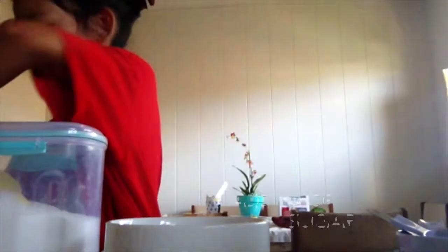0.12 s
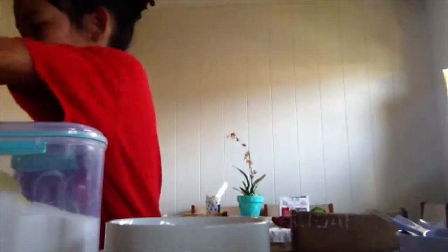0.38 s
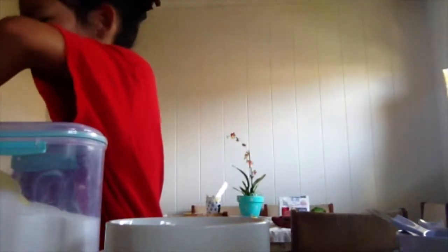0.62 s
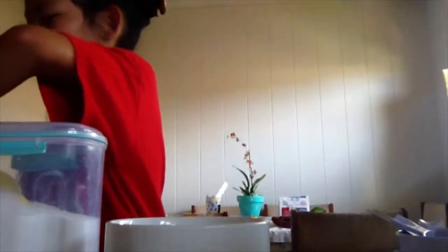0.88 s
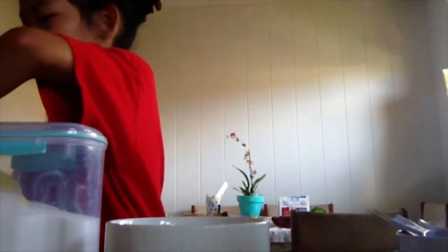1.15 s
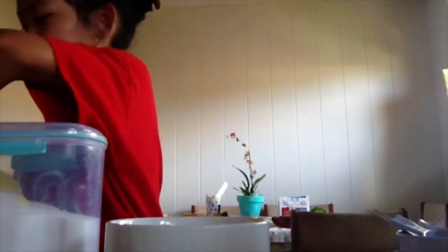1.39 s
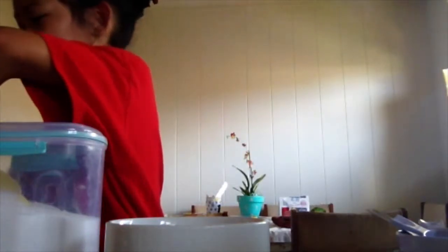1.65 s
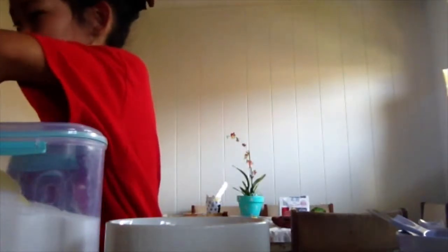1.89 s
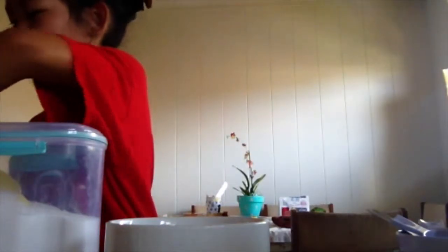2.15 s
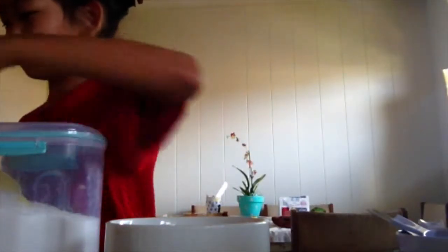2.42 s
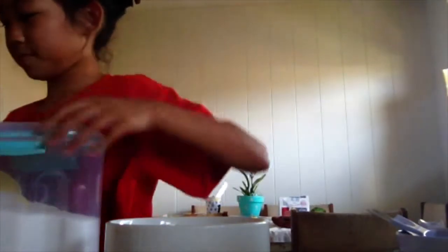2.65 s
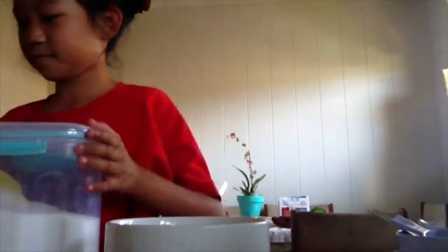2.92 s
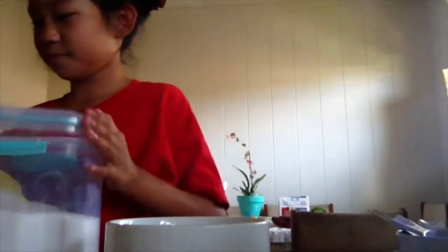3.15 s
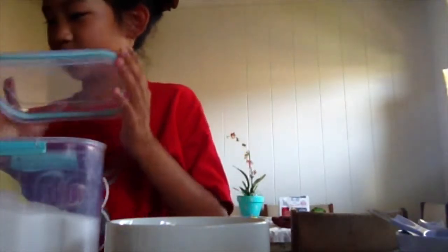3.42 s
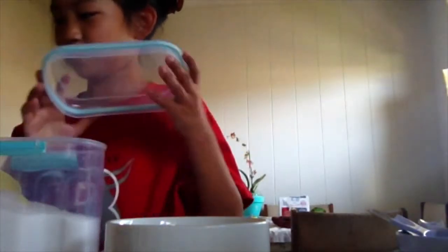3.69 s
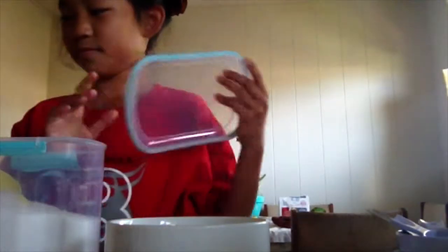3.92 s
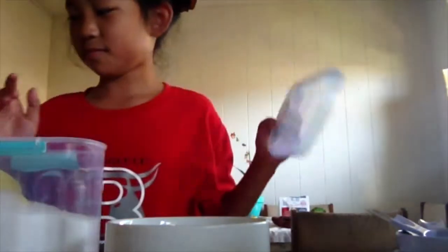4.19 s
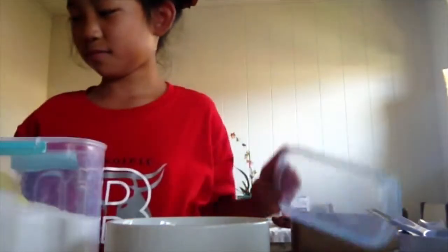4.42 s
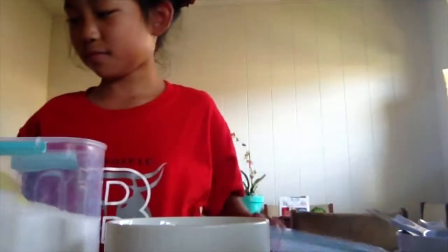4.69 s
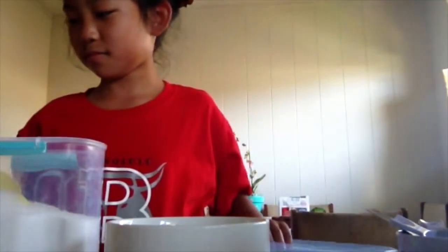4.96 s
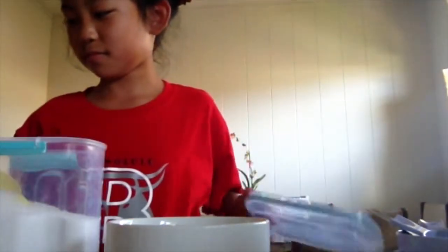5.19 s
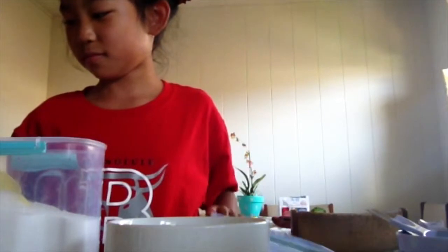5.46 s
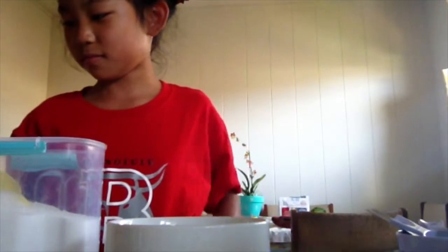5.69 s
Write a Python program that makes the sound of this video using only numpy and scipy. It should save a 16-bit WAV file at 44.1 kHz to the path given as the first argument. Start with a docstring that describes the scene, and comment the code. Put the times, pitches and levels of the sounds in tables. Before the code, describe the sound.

Plastic containers clack and shuffle on a table in a quiet kitchen; a sharp clack midway, later two loud lid slaps.

```python
"""Tubs and a lid on a kitchen table

A faint gliding tone comes before the first knocks. Plastic tubs and a measuring cup are shifted and knocked
on a wooden table in a quiet kitchen, then a flat plastic lid is lifted off a tub, dropped, rattles and is
turned over. Bursts of micro-bounces ring modes of plastic, table and hard edge; drags are dense grains
through such modes; filtered noise makes the room tail. A low room hum and microphone hiss, both of shaped
noise, lie underneath.
"""
import sys
import numpy as np
from scipy import signal
from scipy.fft import rfft, irfft, next_fast_len
from scipy.io import wavfile

SR = 44100
rng = np.random.default_rng(int(sys.argv[2]) if len(sys.argv) > 2 else 0)


def transcribe(signal):
    """Save signal, clipped to [-1, 1], as a 16-bit WAV file at the path in sys.argv[1]."""
    frames = np.atleast_2d(signal).T
    limited = np.clip(frames, -1, 1)
    pcm = np.round(limited * 32767).astype(np.int16)
    wavfile.write(sys.argv[1], SR, pcm)


def boost_factor(decibels):
    """Convert a level in decibels to a linear amplitude factor."""
    exponent = np.asarray(decibels, float) / 20
    return 10 ** exponent


N = 256970


def rms_one(x):
    """Scale to unit rms."""
    return x / np.sqrt(np.mean(x ** 2) + 1e-20)


def drift(rate_hz):
    """Slow chance with spread 1: noise through two equal low-pass poles, computed at every 40th sample."""
    step, settle = 40, 2000
    pole = np.exp(-2 * np.pi * rate_hz * step / SR)
    noise = rng.standard_normal(N // step + settle + 2)
    slow = rms_one(signal.lfilter([1], [1, -2 * pole, pole ** 2], noise)[settle:])
    return np.interp(np.arange(N) / step, np.arange(len(slow)), slow)


# Faint narrow gliding tone before the first knocks: start t/s, end t/s, from f/Hz, to f/Hz, rms level/dB
FAINT_GLIDES = [(0, 0.101, 1120, 1015, -59), (0.219, .285, 1003, 1195, -55.5)]


def faint_tone():
    """A gliding tone, blurred by fast chance in amplitude and phase into a narrow hiss."""
    fade_s = 0.0082
    t, out = np.arange(N) / SR, 0
    blur = 1 + drift(60) + 1j * drift(60)
    for start, end, from_hz, to_hz, level_db in FAINT_GLIDES:
        glide_hz = np.interp(t, [start, end], [from_hz, to_hz])
        phase = 2 * np.pi * np.cumsum(glide_hz) / SR
        outside_s = np.maximum(0, np.maximum(start - t, t - end))
        tone = rms_one(np.imag(blur * np.exp(1j * phase)))
        out = out + boost_factor(level_db) * np.exp(-outside_s / fade_s) * tone
    return out


# Spectrum of room hum and microphone hiss: f/Hz, relative level/dB per Hz
QUIET_SPECTRUM = [(13, -74), (22, -49), (87, -27), (108, -18), (138, -9), (172, -2.5), (260, -6.5),
                  (282, -10.5), (324, -5), (545, -9.5), (608, -14), (737, -14), (2210, -31.5), (5320, -32),
                  (15500, -33)]


def quiet():
    """Steady noise of the room and the microphone; the low part wavers a little."""
    level_db = -51
    size = next_fast_len(N)
    hz = np.arange(size // 2 + 1) * SR / size + 1     # 1 Hz up, to keep the logarithm finite
    at_hz, db = np.transpose(QUIET_SPECTRUM)
    shape = boost_factor(np.interp(np.log(hz), np.log(at_hz), db))
    noise = rms_one(irfft(rfft(rng.standard_normal(size)) * shape, size)[:N])
    low = signal.sosfilt(signal.butter(1, 900, fs=SR, output="sos"), noise)
    waver_db = 2.2 * drift(8.1) + 1.3 * drift(45)
    return boost_factor(level_db) * (noise - low + low * boost_factor(waver_db))


def ringing(modes, spread_db, damping):
    """Response of a body to one soft touch; every touch lands elsewhere and weighs the modes anew."""
    rise_cycles = 0.27
    hz, level_db, t60 = np.transpose(modes)[:, :, None]
    t = np.arange(SR // 4) / SR
    weight = boost_factor(level_db + spread_db * rng.standard_normal(hz.shape))
    weight = weight * rng.choice([-1, 1], hz.shape)
    # the grip bends the plastic and detunes it; table modes scatter alike
    hz = hz * (1 + 0.015 * rng.standard_normal(hz.shape))
    rise = (1 - np.exp(-t * hz / rise_cycles)) ** 2     # plastic yields, so no mode starts abruptly
    decay = boost_factor(-60 * damping * t / t60)
    return np.sum(weight * rise * decay * np.sin(2 * np.pi * hz * t), axis=0)


def chatter(decay_ms):
    """The force of a contact: one blow among uneven micro-bounces that swell for a moment, then die."""
    main_blow_s, swell_s = 0.0028, 0.0021     # the main blow lands after the first edge touches
    bounces_per_s = 5000
    t = np.arange(SR // 10) / SR
    bounces = rng.standard_normal(len(t)) * (rng.random(len(t)) < bounces_per_s / SR)
    force = bounces * (1 - np.exp(-t / swell_s)) ** 2
    force[round(main_blow_s * SR)] = 2.28
    return force * np.exp(-1000 * np.maximum(t - main_blow_s, 0) / max(decay_ms, 0.3))


# Wooden table: f/Hz, relative level/dB, t60/s before contact damping
TABLE_MODES = [(150.4, -16.5, 0.057), (169.5, -10.5, 0.17), (219, -8, 0.043), (279, -4, 0.035),
               (358, 2.5, 0.044), (404.4, 1, 0.028), (459, 0.5, 0.032)]


def knocks(rows, plastic, bright, tick, tick_db):
    """One force rings plastic, table and the hard edge; strong blows rebound at once, weak ones linger."""
    firm_db, firm_ms, firmer_shortens = -22, 8.3, 0.32     # dB shorter for each dB stronger
    tick_follows_weight, usual_weight_db = 0.17, -16     # an edge landing squarely on the table ticks more
    out, first = np.zeros(N + SR), SR // 80     # side parts are levelled over their first 12.5 ms
    for start_s, peak_db, weight_db, hardness_db in rows:
        decay_ms = firm_ms * boost_factor(firmer_shortens * (firm_db - peak_db))
        force, at = chatter(decay_ms), round(start_s * SR)
        damping = max(1.3, decay_ms / 5)     # staying in touch damps the ring
        body, *rest = [signal.fftconvolve(force, ringing(modes, spread_db=2.5, damping=damping))
                       for modes in (plastic, TABLE_MODES, bright, tick)]
        sound = body / np.abs(body).max()
        edge_tick_db = hardness_db + tick_db + tick_follows_weight * (weight_db - usual_weight_db)
        for part, level_db in zip(rest, (weight_db, hardness_db, edge_tick_db)):
            sound += boost_factor(level_db) * part / np.sqrt(np.mean(part[:first] ** 2))
        out[at:at + len(sound)] += boost_factor(peak_db) * sound
    return out[:N]


# Tub on the table: t/s, plastic peak level/dB, table level/dB and hard-edge level/dB re that peak
TUB_KNOCKS = [(0.279, -32.5, -11.5, -18), (0.315, -29, -9, -14.5), (0.332, -26.5, -5.5, -18.5),
              (0.363, -24, -9.5, -15), (0.39, -29, -22, -16.5), (0.519, -32.5, -16, -25)]
# Body and bright ring of cup and tub: f/Hz, relative level/dB, t60/s before contact damping
CUP_MODES = [(553, 1.5, 0.035), (596, -6.5, 0.096), (708, -8, 0.046), (785, -9, 0.098), (897, -16.5, 0.12),
             (983, -1.5, 0.065), (1060, 1.5, 0.028), (1387, 2, 0.018), (1353, -6.5, 0.06)]
CUP_BRIGHT_MODES = [(1550, -6, .03), (1810, -12, .15), (1870, -2, .04), (1975, 0, .05), (2060, -3, .035),
                    (2330, -7, .02), (2640, -8, .015), (2950, -10, .012)]
# Tick of the hard rim of tub or lid: f/Hz, relative level/dB, t60/s before contact damping
RIM_TICK_MODES = [(3120, 6, 0.0034), (3970, -3, 0.0057), (4610, -4, 0.0079), (5430, 0, 0.0035),
                  (7000, -11, 0.0088), (8250, -12.5, 0.0032), (9400, -10.5, 0.0037), (11900, -13, 0.0037),
                  (14800, -16, 0.0041)]


def tub_knocks():
    """A tub rings like the cup, but its hard rim ticks like the lid's."""
    return knocks(TUB_KNOCKS, CUP_MODES, CUP_BRIGHT_MODES, RIM_TICK_MODES, tick_db=-9.5)


# The kitchen's tail, band above band from 60 Hz: upper f/Hz, level/dB, t60/s
ROOM_BANDS = [(480, -7.5, 0.31), (1403, -10, 0.19), (3000, -12.5, 0.3), (12440, -11, 0.18)]


def kitchen(x):
    """Dense reflections: noise that swells for a few ms and dies band by band."""
    t, tail, low_hz = np.arange(SR // 2) / SR, 0, 60
    for top_hz, level_db, t60 in ROOM_BANDS:
        band_pass = signal.butter(2, [low_hz, top_hz], "band", fs=SR, output="sos")
        band = signal.sosfilt(band_pass, rng.standard_normal(len(t)))
        band = band * boost_factor(-60 * t / t60) * (1 - np.exp(-t / 0.012))
        share = 2 * (top_hz - low_hz) / SR     # a click's energy in this band
        tail = tail + boost_factor(level_db) * band * np.sqrt(share / np.sum(band ** 2))
        low_hz = top_hz
    return signal.fftconvolve(x, tail)[:N]


# Plastic dragged over wood: start t/s, loudest t/s, end t/s, rms level/dB at the loudest,
# hiss of the hard edge re that level/dB
DRAGS = [(0.36, 0.474, 0.66, -47.5, -12.5), (0.732, 0.755, 0.84, -48, -23), (0.842, 0.962, 1.12, -41, -21),
         (1.065, 1.112, 1.244, -42, -21), (1.264, 1.31, 1.52, -58, -6), (1.395, 1.66, 2.4, -55, -23),
         (2.08, 2.397, 2.5, -55.5, -25), (4.622, 4.66, 4.73, -39, -13.5), (5.347, 5.371, 5.44, -35, -24),
         (5.667, 5.75, 6, -44.5, -16)]


def drags():
    """Dense stick-slip grains excite the plastic, damped by the hand, and the table while something slides."""
    swell_db = 12.5     # rise from either end to the loudest moment
    t, level, edge = np.arange(N) / SR, 0, 0
    for start, loudest, end, db, edge_db in DRAGS:
        below_db = np.interp(t, [start, loudest, end], [swell_db, 0, swell_db])
        swell = boost_factor(db - below_db) * (t > start) * (t < end)
        level = level + swell
        edge = edge + boost_factor(edge_db) * swell
    noise = rng.standard_normal(N)
    grains_per_s = 2500 * boost_factor(3 * drift(25))
    grains = rms_one(noise * (rng.random(N) < grains_per_s / SR))
    out = 0
    for modes, gain in [(CUP_MODES, level), (TABLE_MODES, boost_factor(-5.5) * level),
                        (CUP_BRIGHT_MODES, boost_factor(-11) * level), (RIM_TICK_MODES, edge)]:
        body = ringing(modes, spread_db=0, damping=4)
        out = out + signal.fftconvolve(gain * grains, body)[:N] / np.sqrt(np.sum(body ** 2))
    return out


# Dull thuds of a hand or a tub on the table: t/s, table rms level/dB at the onset
THUDS = [(0.483, -43), (2.899, -38), (3.114, -44), (3.178, -42), (3.222, -45), (3.871, -41.5)]
# Lid body and its bright ring: f/Hz, relative level/dB, t60/s before contact damping
LID_MODES = [(528, -6, 0.04), (652, -7, 0.02), (637, -10.5, 0.02), (750, -12, 0.017), (815, -7, 0.016),
             (856, 1, 0.018), (947, 2, 0.0096), (1085, -21, 0.034), (1324, -7.5, 0.038), (1476, -12, 0.027)]
LID_BRIGHT_MODES = [(1520, -3, .03), (1650, -4, .03), (1810, -4, .03), (1940, -2, .035), (2200, -8, .02),
                    (2500, -11, .015), (2850, -14, .012)]
LID_TICK_DB = -12.5     # tick of the lid's edge re its bright ring, before the table's weight alters it


def thuds():
    """The table takes the blow and the lid nearby answers faintly."""
    lid_db, hardness_db = -7, -24.5     # lid peak re the table; bright ring re the lid peak
    rows = [(start_s, db + lid_db, -lid_db, hardness_db) for start_s, db in THUDS]
    return knocks(rows, LID_MODES, LID_BRIGHT_MODES, RIM_TICK_MODES, LID_TICK_DB)


# Cup on the table: t/s, plastic peak level/dB, table level/dB and hard-edge level/dB re that peak
CUP_KNOCKS = [(0.748, -29, -18, -16.5), (0.767, -29.5, -17, -36), (0.861, -29, -22, -9.5),
              (0.882, -24.5, -5.5, -20), (0.936, -28, -22, -18), (0.954, -27.5, -22, -9),
              (0.997, -36.5, -27, -8), (1.036, -27.5, -35, -17), (1.07, -39, 1, -19),
              (1.089, -20.5, -9, -26), (1.125, -29, -12.5, -19), (1.175, -33.5, -6, -21),
              (1.477, -32, -11.5, -29), (1.499, -30.5, -6.5, -36), (1.68, -36.5, -33, -22),
              (1.711, -31, -13, -20), (1.836, -7.5, -20, -12), (2.088, -24.5, -25, -16.5),
              (2.141, -29.5, -22, -18), (2.176, -23, -42, -12), (2.229, -25, -40, -17.5),
              (2.274, -26, -25, -19), (2.312, -24, -15, -12), (2.344, -26.5, -29, -20),
              (2.376, -24.5, -37, -13), (2.402, -20.5, -19, -12.5), (2.424, -28, -16, -10)]
# Tick of the cup's edge: f/Hz, relative level/dB, t60/s before contact damping
CUP_TICK_MODES = [(3553, -1.5, 0.0061), (3470, 0.5, 0.0079), (4170, -12, 0.003), (4770, -29, 0.039),
                  (5500, -16.5, 0.0023), (7160, -25.5, 0.0022)]


def cup_knocks():
    """The measuring cup's wall rings on the table and its edge ticks."""
    return knocks(CUP_KNOCKS, CUP_MODES, CUP_BRIGHT_MODES, CUP_TICK_MODES, tick_db=-17)


# Lid on the table: t/s, plastic peak level/dB, table level/dB and hard-edge level/dB re that peak
LID_KNOCKS = [(4.509, -2.5, -9, -30), (4.543, -35.5, -35, -8), (4.575, -19, -27, -20),
              (4.59, -32, -19, -14), (4.611, -27, -1, -32), (4.632, -17.5, -21, -12.5),
              (4.655, -29.5, -10, -6), (4.674, -27, -8, -11), (4.737, -23, -16, -20), (4.748, -37, -2, -21),
              (4.82, -26.5, -5.5, -13.5), (4.845, -34.5, -13, -17), (5.05, -42, -7, -17.5),
              (5.111, -25, -15, -20.5), (5.129, -30.5, -22, -30), (5.352, -5.5, -7, -24),
              (5.445, -24, -32, -19), (5.64, -30, -10, -21.5), (5.668, -35.5, 11, -11.5),
              (5.697, -20.5, 4.5, -17), (5.716, -32.5, 7, -18), (5.744, -29.5, -14.5, -6.5),
              (5.76, -25.5, -9, -15.5), (5.777, -42, -21, -12), (5.795, -28, -9, -13.5)]


def lid_knocks():
    """The flat lid drops and rattles: short body modes with a crisp tick of the rim."""
    return knocks(LID_KNOCKS, LID_MODES, LID_BRIGHT_MODES, RIM_TICK_MODES, LID_TICK_DB)


def scene():
    """The faint tone, all handling on the table with its room tail, and the quiet, as they reach the microphone."""
    handling = tub_knocks() + drags() + thuds() + cup_knocks() + lid_knocks()
    # the handling sounds carry no deep bass
    handling = signal.sosfilt(signal.butter(5, 120, "high", fs=SR, output="sos"), handling)
    return (faint_tone() + quiet() + handling + kitchen(handling))[None]


def low_pass(x):
    """Removes everything above the highest recorded frequency."""
    return signal.sosfilt(signal.butter(12, 16300, fs=SR, output="sos"), x)


def record(dry):
    """The top is cut at 15.6 kHz, then peaks are softly rounded."""
    cut = signal.sosfilt(signal.cheby2(14, 60, 15600, fs=SR, output="sos"), dry)
    mix = 1.284 * np.tanh(cut / 1.668)
    return low_pass(mix)


dry = scene()
out = record(dry)
transcribe(out)
```